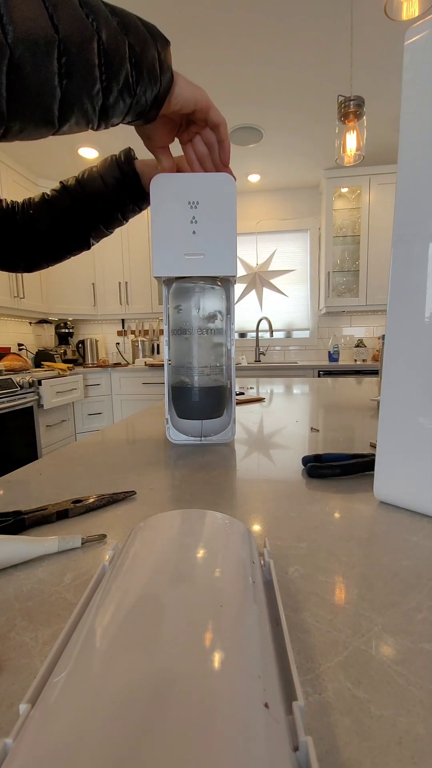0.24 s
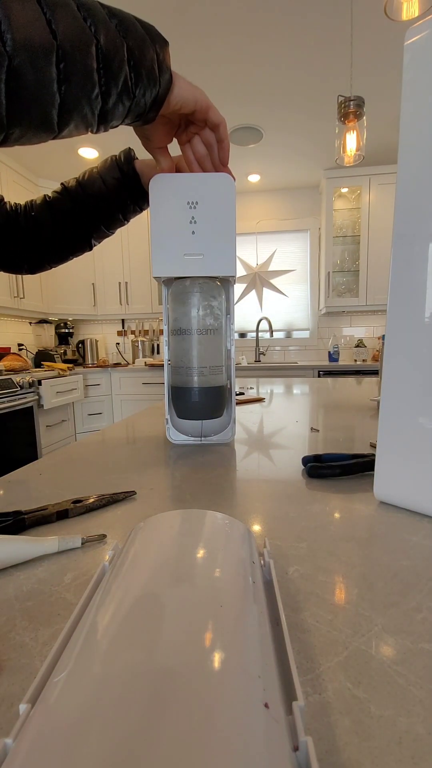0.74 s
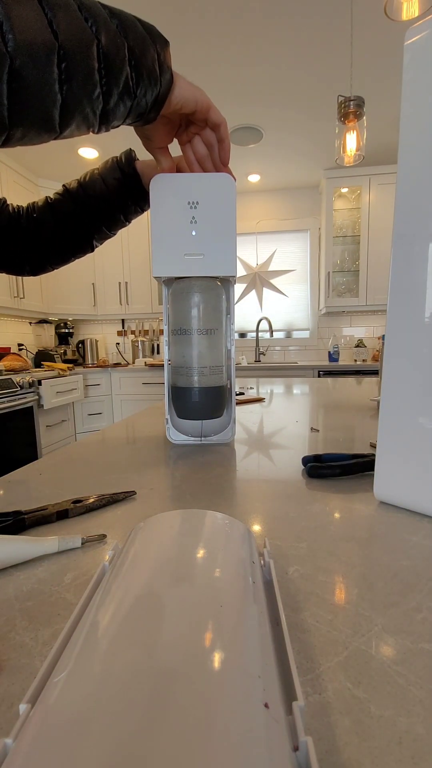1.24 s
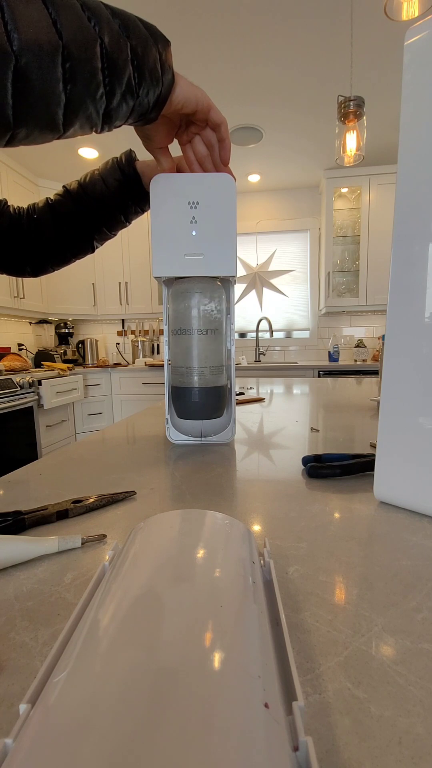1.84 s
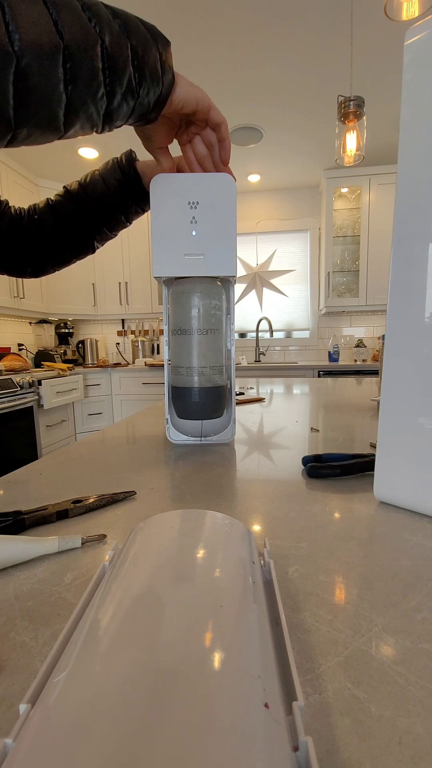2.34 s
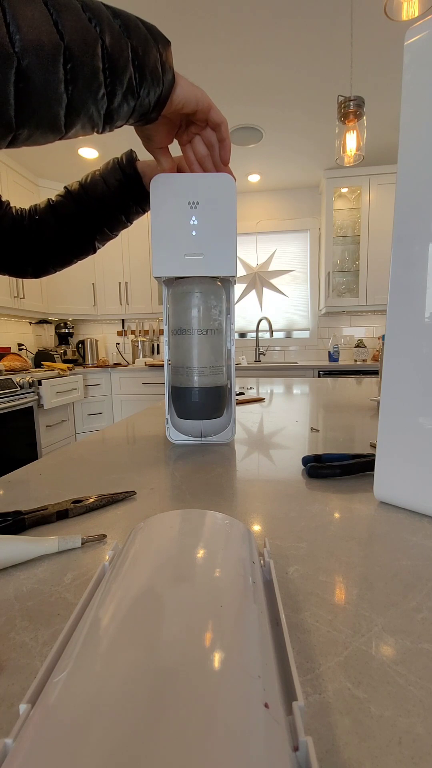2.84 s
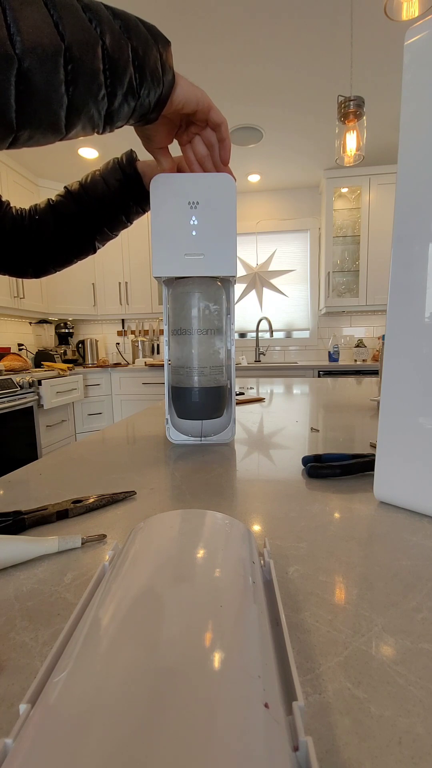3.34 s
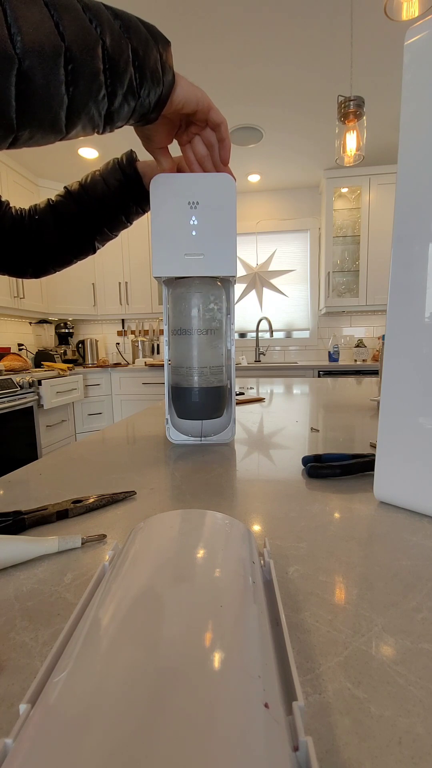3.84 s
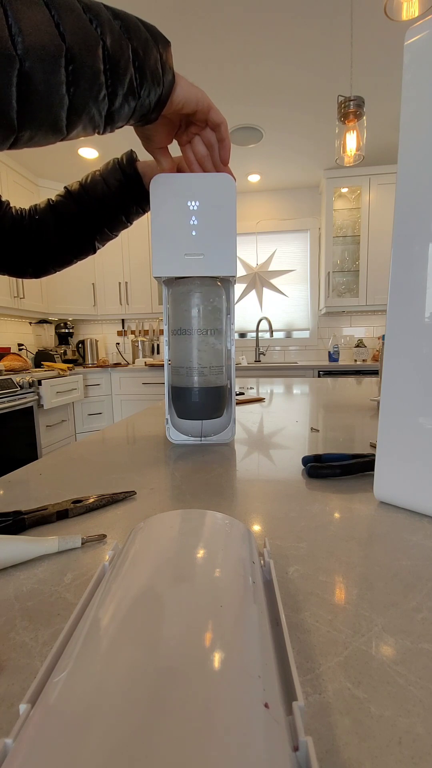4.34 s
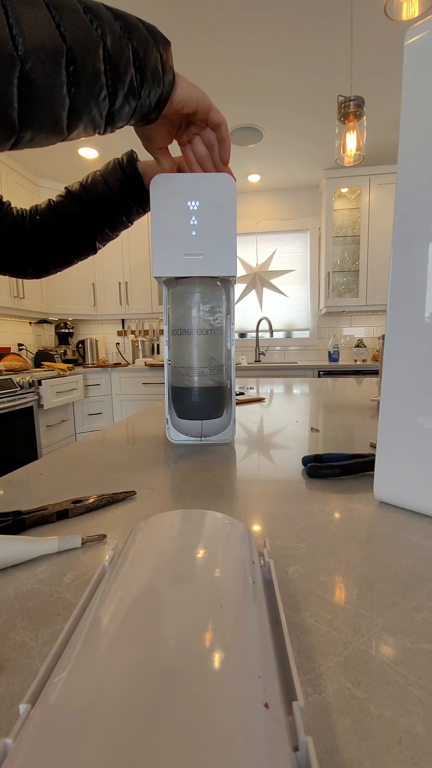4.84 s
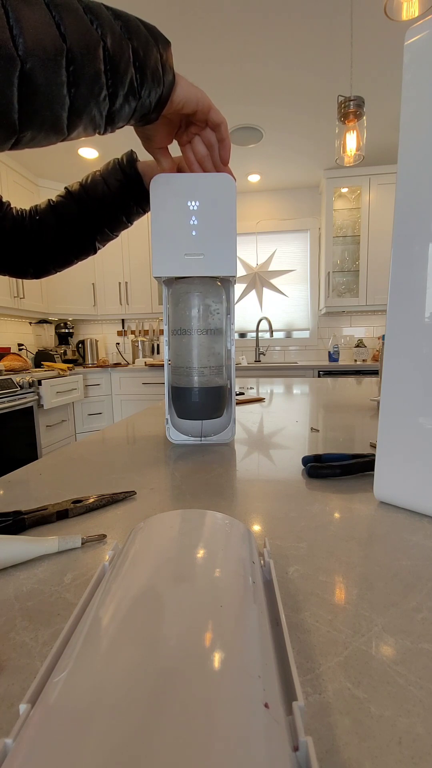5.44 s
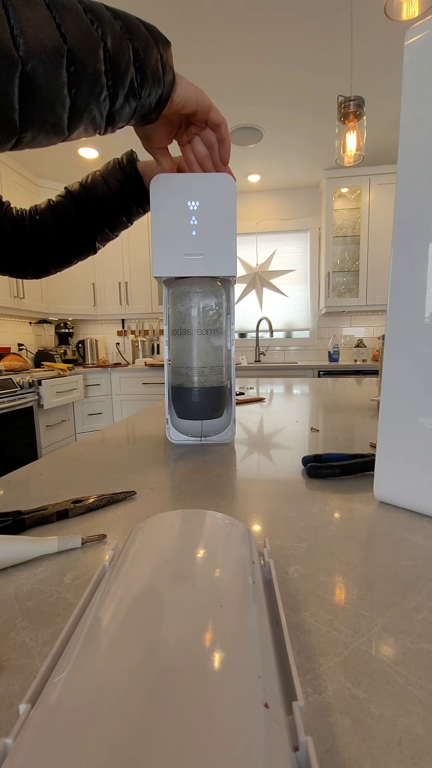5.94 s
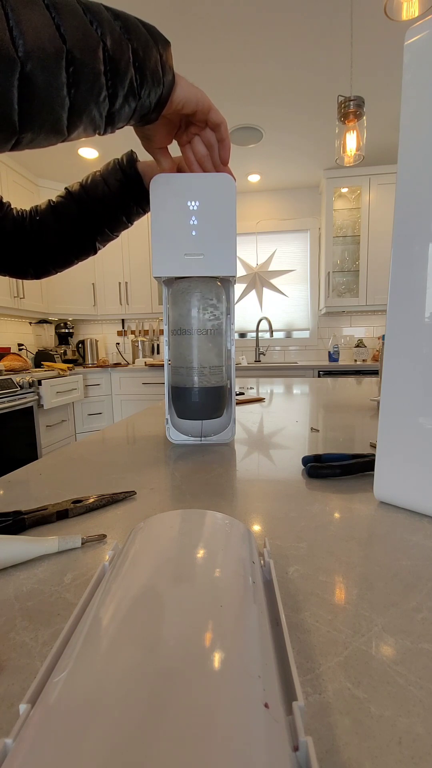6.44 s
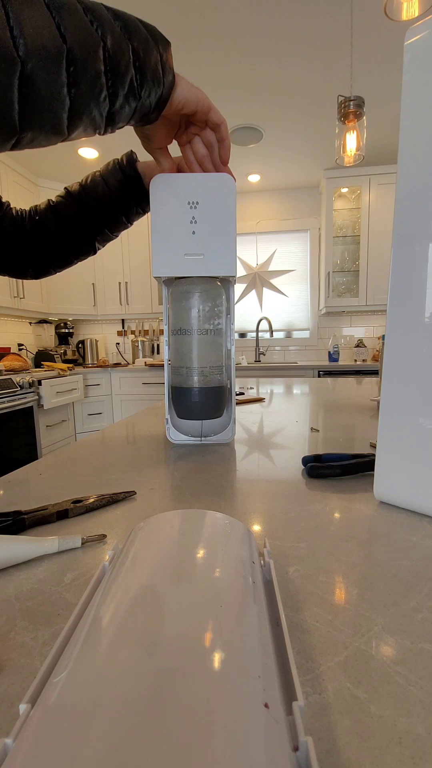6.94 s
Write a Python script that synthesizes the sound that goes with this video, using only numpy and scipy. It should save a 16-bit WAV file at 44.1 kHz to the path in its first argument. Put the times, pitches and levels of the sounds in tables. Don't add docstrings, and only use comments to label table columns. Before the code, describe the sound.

A home carbonator on a kitchen counter is already driving gas into a plastic bottle of water at 0 s, with a bright burst fading within a fraction of a second. Rounded bubbles glug through a ringing, gritty rush until about 0.7 s. Around 0.8 s hard hollow pops strike the bottle wall, clustering strongly to 1.7 s, then recurring irregularly until 6.4 s. The steady roar of bubbles sits around 2 to 3 kHz, nasal and whistling, as lower gurgle shrinks and fine fizz grows. From roughly 2.5 s airy spray brightens it, with tiny faint droplet whistles between 1.7 and 4 s. Near 4 s a thin high valve hiss opens and slowly strengthens. Low rumble remains slight. At about 7.15 s a low gust and small glug mark release as it ends. The close phone microphone hears uneven left and right sides and short hard-wall reflections.

```python
import sys
import numpy as np
from scipy import signal
from scipy.fft import rfft, irfft, next_fast_len
from scipy.io import wavfile
from scipy.ndimage import uniform_filter1d, minimum_filter1d, map_coordinates

SR = 44100
rng = np.random.default_rng(int(sys.argv[2]) if len(sys.argv) > 2 else 0)


def file_out(sig):
    cols = np.atleast_2d(sig).T
    lim = np.clip(cols, -1, 1)
    pcm = np.round(lim * 32767).astype(np.int16)
    wavfile.write(sys.argv[1], SR, pcm)


def to_linear_factor(level_db):
    exponent = np.asarray(level_db, float) / 20
    return 10 ** exponent


N = 316638

# time_s, level_db
JET_LEVEL = [(0.0, -28.5), (0.3, -32.5), (0.78, -30), (0.83, -25), (1.4, -22), (1.5, -22), (1.94, -25.5),
             (2.12, -23), (2.4, -25), (3.2, -25), (3.76, -27.5), (3.9, -26.5), (4.26, -27), (4.5, -25),
             (4.85, -28), (5.62, -23.5), (5.86, -27.5), (7.18, -27)]
# pitch_hz, spread_log_pitch, life_cycles
BUBBLE_FAMILIES = [
    (1439, 0.17, 20),
    (2733, 0.2825, 20.1),
    (4620, 0.177, 32.7),
    (7240, 0.079, 42),
]
# freq_hz, gain_db
BOTTLE_WALL = [(500, -40), (1000, -10.5), (1400, -4.5), (3000, 3), (4800, -8), (5700, -5), (6300, -15),
               (7500, -14), (10000, -40)]
# start_s, peak_db, life_cycles
POCKET_POPS = [(0.8157, -14.5, 46), (0.8433, -4, 52), (0.9687, -7, 18), (1.0654, -7, 23), (1.2293, -11, 23),
               (1.4034, -10, 17), (1.4501, -4, 21), (1.5084, -8.5, 21), (1.5644, -10, 28),
               (1.629, -4.5, 23.4), (1.6908, -5, 9.5), (2.1982, -5, 11.5), (2.3922, -9.5, 16),
               (2.5442, -17, 18), (2.6051, -12.5, 23), (2.6446, -11, 16), (3.1758, -10, 19),
               (3.244, -14, 21), (3.6013, -10.5, 21), (3.7921, -13, 27), (3.9199, -8.5, 25),
               (4.429, -10.5, 30), (4.656, -11, 17), (4.855, -18, 22), (5.0044, -8, 8.5), (5.1602, -36, 23),
               (5.4854, -10, 14), (5.564, -10, 18), (6.2726, -8, 19), (6.3685, -11, 8.3)]
# start_s, peak_db, pitch_hz, life_cycles, pitch_rise_ratio
GLUG_EVENTS = [(0.108, -9, 2710, 21, 0.025), (.258, -23, 710, 31, 0.14), (.275, -30, 1080, 25, 0.17),
               (.295, -16, 1640, 34, .06), (.31, -24, 2070, 54, 0.22), (0.329, -27, 2526, 68, .01),
               (.335, -24, 1810, 36, 0.047), (0.44, -21, 2840, 62, 0.024), (.465, -32, 2080, 22, .03),
               (.5, -21, 1320, 25, .04), (0.554, -21, 2460, 26, .04), (.635, -19.5, 1416, 28, .03),
               (.65, -28, 3750, 48, .01), (.695, -22.5, 1340, 39, 0.018), (1.01, -14.5, 1393, 27, 0.024),
               (1.035, -15.5, 1330, 27, 0.035), (.003, -24, 290, 7.7, .02), (7.035, -34.5, 370, 18, .05),
               (7.163, -19, 610, 8.4, 0.054), (7.166, -18, 2470, 15, .02)]
# start_s, peak_db, pitch_hz
NOZZLE_SPITS = [(1.6826, -55, 7400), (1.9431, -52, 7400), (1.966, -52, 7460), (2.3496, -49, 7300),
                (2.392, -95, 7660), (2.4165, -47, 7700), (2.5347, -60, 7450), (2.6514, -74, 7040),
                (2.866, -49, 6800), (2.9962, -44, 7580), (3.3134, -51, 7800), (3.4831, -50, 7400),
                (3.5404, -56, 7700), (3.8602, -44, 6600), (3.9191, -56, 7080), (4.0513, -48, 7400)]
FIRST_RUSH_DB = [-22, -34, -35, -32, -42.5, -41]
# freq_hz, density_db_per_hz
BURST_SPECTRUM = [(1760, -51), (3000, -0.5), (3640, -9.5), (4600, -7), (5280, 0), (6360, -7), (7250, -4),
                  (8790, -10.5), (10700, -10.5), (15600, -18)]
# freq_hz, density_db_per_hz
HISS_SPECTRUM = [(3820, -15), (6500, -3.5), (7780, 1), (8120, 5), (8580, 2), (9510, 1), (10900, 1.5),
                 (12700, 0.5), (14200, 1), (15600, -2)]
# freq_hz, width_hz, gain_db
CASE_NOTCHES = [(8500, 300, -5.5), (9480, 170, -4), (13100, 470, -11)]
# freq_hz, density_db_per_hz
ROAR_SPECTRUM = [(210, -52), (350, -6), (487, -6), (548, -0.5), (774, 3.5), (1030, 1), (1200, -1),
                 (1560, -34), (2640, -120)]
# freq_hz, density_db_per_hz
RUMBLE_SPECTRUM = [(15, -55), (45, -24), (66, -8), (97, -17.5), (141, -3), (173, -5.5), (200, -0.5),
                   (226, -6), (258, 2), (409, -8.5), (450, -5.5), (580, -9), (990, -120)]
# freq_hz, density_db_per_hz
BOOM_SPECTRUM = [(120, -18), (140, -19), (147, 8), (155, -7), (180, -21)]
# centre_s, level_db, width_s
COUNTER_SHUDDERS = [(.29, -47, .04), (.54, -43, 0.14), (1.0, -53, 0.086), (5.25, -54, .08)]
# freq_hz, t60_s
KITCHEN_DECAY = [(150, .3), (1000, .13), (4000, .09), (12000, .1)]
# freq_hz, gain_db
ROOM_GAIN = [(60, -16), (250, -17), (700, 0.5), (1500, 3), (2500, 1), (5000, 6), (9000, -6.5),
             (12000, -0.5), (15000, -0.5)]
# freq_hz, width_hz, gain_db
CAVITY_MODES = [(2106, 277, 2.5), (2552, 264, 18), (2975, 190, -5), (3750, 600, 1.5), (5100, 840, -8.5),
                (7330, 300, -6), (10100, 900, -13), (14900, 850, -15)]
# freq_hz, gain_db
LEFT_SHADE = [(300, 0), (800, -7), (1500, -7), (2500, -8.5), (3100, -8), (4500, -5), (6500, -6.5),
              (8800, -7), (11000, -1), (15000, 0)]
# freq_hz, phase_rad
LEFT_LEAD = [(0, 0), (860, 0.3), (1720, -0.1), (2840, 3.7), (3620, 4.8), (4390, 9.4), (5250, 8.3),
             (6370, 12.6), (6980, 12.6), (15300, 12.6)]
# freq_hz, density_db_per_hz
PORT_SPECTRUM = [(25, -22), (45, 0), (100, -2), (300, 4), (1000, -20), (9000, -26), (13000, -18),
                 (16000, -21)]

FILL_START_S, FILL_S = 0.8, 0.76
LARGE_DB, LARGE_LOSS_DB, LARGE_FOLLOWS = -34, 7.5, 0.33
FINE_DB, FINE_GAIN_DB, FINE_FOLLOWS = -45.5, 11.5, 0.62
SPRAY_DB, SPRAY_GAIN_DB, SPRAY_S, SPRAY_RISE_S = -52, 11.5, 2.6, 0.18
SPIT_FIZZ_DB, SPIT_FIZZ_S = -4, 0.022
SMALL_POP_DB, SMALL_SPREAD_DB, SMALL_CYCLES = 7.5, 6, 30
CRACK_DB = -11
DEEP_DB, DEEP_LOSS_DB = -8, 17
RUSH_DB_PER_S, SETTLE_DB_PER_S = 61, 12.5
SETTLE_HISS_DB, SETTLE_ROAR_DB, SETTLE_RUMBLE_DB = -43, -41, -73.5
HISS_DB, ROAR_DB, RUMBLE_DB, BOOM_DB = -53, -56.5, -57.5, -59
PUFF_S, PUFF_DB, PUFF_WIDTH_S = 0.11, -31, 0.006
RELIEF_S, RELIEF_RISE_S, CREEP_S = 3.94, 0.13, 0.92
LEAK_DB, LEAK_ROAR_DB, CRACK_SHARE = -44, -53.5, 0.3
RELEASE_S, RELEASE_RISE_S, RELEASE_ROAR_DB, RELEASE_RUMBLE_DB = 7.165, 0.015, -38, -50
FACING_DB = -9
PORT_DB, TOP_HZ = -75, 15730


def bubbles():
    t = np.arange(N) / SR
    jet_db, = curves(JET_LEVEL)
    swing_db = jet_db - jet_db.mean()
    first = to_linear_factor(-RUSH_DB_PER_S * t)
    _, rush_large_db, rush_fine_db, rush_spray_db, _, _ = FIRST_RUSH_DB

    large_db = LARGE_DB - LARGE_LOSS_DB * pressure(t) + LARGE_FOLLOWS * swing_db
    fine_db = FINE_DB + FINE_GAIN_DB * pressure(t) + FINE_FOLLOWS * swing_db
    spray_db = SPRAY_DB + SPRAY_GAIN_DB * ramp(SPRAY_S, SPRAY_RISE_S) + 2.1 * wobble(22)
    fizz = sum(to_linear_factor(db + SPIT_FIZZ_DB) * bell(t, s, SPIT_FIZZ_S) for s, db, _ in NOZZLE_SPITS)
    levels = [to_linear_factor(large_db) + to_linear_factor(rush_large_db) * first,
              to_linear_factor(jet_db - 8.5),
              to_linear_factor(fine_db) + to_linear_factor(rush_fine_db) * first,
              to_linear_factor(spray_db) + to_linear_factor(rush_spray_db) * first + fizz]

    surge_db = 1.3 * flutter(30) + 1.37 * flutter(80)
    cloud = np.zeros(N)
    for (hz, spread, cycles), level in zip(BUBBLE_FAMILIES, levels):
        when, side, rare = rng.random((3, 3000))
        pitch_hz = hz * np.exp(spread * rng.standard_normal(3000))
        size_db = np.minimum(-2.8 * np.log(rare + 1e-9), 13)
        gain = to_linear_factor(size_db) * np.sign(side - 0.5)
        swarm = rings(when * N / SR, pitch_hz, cycles, gain, glide=0.048, onset=1.53, size=400)
        band = [(hz * np.exp(k * spread), db) for k, db in [(-4, -24), (-1, 0), (1, 0), (4, -24)]]
        foam = rush(band, patchy_db=2.17)
        cloud += level * to_linear_factor(surge_db + 0.41 * flutter(30)) * unit(unit(swarm) + 0.99 * foam)
    return filtered(cloud, lambda f: to_linear_factor(along(BOTTLE_WALL, f)))


def pops(count=90):
    when_s, size = rng.random(count) * N / SR, rng.standard_normal(count)
    jet_db = np.interp(when_s, *np.transpose(JET_LEVEL))
    small_db = jet_db + SMALL_POP_DB + SMALL_SPREAD_DB * np.clip(size, -2, 1.2)
    small = np.array([when_s, small_db, np.full(count, SMALL_CYCLES)])
    large = np.transpose(POCKET_POPS) + [[0], [6], [0]]
    s, db, cycles = np.hstack([small, large])

    knock_dev, deep_dev, chance = rng.standard_normal((len(s), 3)).T
    knock_hz = 2590 * np.exp(0.049 * knock_dev)
    crack_hz = 3400 * np.exp(0.15 * chance)
    deep_hz = 1450 * np.exp(0.052 * deep_dev)
    deep_db = db + DEEP_DB - DEEP_LOSS_DB * pressure(s) + 1.9 * chance
    knock = rings(s, knock_hz, np.clip(cycles, 2, 40), to_linear_factor(db - 13.5), glide=0.0073, size=900)
    crack = rings(s, crack_hz, 5.1, to_linear_factor(db + CRACK_DB), glide=0.022, size=128)
    deep = rings(s, deep_hz, 8.3, to_linear_factor(deep_db), glide=0.025)
    return knock + crack + deep


def glugs():
    s, db, hz, cycles, rise = np.transpose(GLUG_EVENTS)
    return rings(s, hz, cycles, to_linear_factor(db), glide=rise[:, None], onset=6.5, size=2400)


def spits():
    s, db, hz = np.transpose(NOZZLE_SPITS)
    return rings(s, hz, 124, to_linear_factor(db + 9.5), glide=0.011, onset=12, size=1200)


def valve():
    t = np.arange(N) / SR
    first, settle = to_linear_factor(-RUSH_DB_PER_S * t), to_linear_factor(-SETTLE_DB_PER_S * t)
    release = ramp(RELEASE_S, RELEASE_RISE_S)
    creep = 1 - np.exp(-np.maximum(t - RELIEF_S, 0) / CREEP_S)
    leak = ramp(RELIEF_S, RELIEF_RISE_S) * (CRACK_SHARE + (1 - CRACK_SHARE) * creep)
    rush_burst_db, _, _, _, rush_roar_db, rush_rumble_db = FIRST_RUSH_DB

    burst_level = to_linear_factor(rush_burst_db) * first + to_linear_factor(PUFF_DB) * bell(t, PUFF_S, PUFF_WIDTH_S)
    burst = burst_level * rush(BURST_SPECTRUM, patchy_db=1.5)

    hiss_level = to_linear_factor(HISS_DB) + to_linear_factor(SETTLE_HISS_DB) * settle + to_linear_factor(LEAK_DB) * leak
    hiss = hiss_level * to_linear_factor(0.9 * flutter(20)) * rush(HISS_SPECTRUM, patchy_db=1.5)
    hiss = filtered(hiss, lambda f: to_linear_factor(sum(db * bell(f, hz, width) for hz, width, db in CASE_NOTCHES)))

    roar_level = (to_linear_factor(ROAR_DB) + to_linear_factor(rush_roar_db) * first + to_linear_factor(SETTLE_ROAR_DB) * settle
                  + to_linear_factor(LEAK_ROAR_DB) * leak + to_linear_factor(RELEASE_ROAR_DB) * release)
    roar = roar_level * to_linear_factor(0.27 * wobble(10)) * rush(ROAR_SPECTRUM, patchy_db=3.5)

    rumble_level = (to_linear_factor(RUMBLE_DB) + to_linear_factor(rush_rumble_db) * first + to_linear_factor(SETTLE_RUMBLE_DB) * settle
                    + to_linear_factor(RELEASE_RUMBLE_DB) * release)
    rumble = rumble_level * to_linear_factor(0.81 * wobble(5.5)) * rush(RUMBLE_SPECTRUM, patchy_db=3.0)

    shudder = sum(to_linear_factor(db) * bell(t, s, width) for s, db, width in COUNTER_SHUDDERS)
    boom = (to_linear_factor(BOOM_DB + 1.5 * wobble(3.94)) + shudder) * rush(BOOM_SPECTRUM, patchy_db=-2.0)
    return burst + hiss + roar + rumble + boom


def kitchen(x, count=8):
    hz, t, z = signal.stft(rng.standard_normal((count, 2, SR // 3)), SR, nperseg=256)
    z = z * to_linear_factor(-60 * t / along(KITCHEN_DECAY, hz)[:, None])
    z = z / np.sqrt(np.mean(abs(z) ** 2, axis=(0, 1, 3), keepdims=True))
    tails = signal.istft(z, SR, nperseg=256)[1]
    tails = tails / np.linalg.norm(tails[0, 0])
    away = (np.arange(N) / (SR // 24) - np.arange(count)[:, None]) % count
    turns = np.sin(np.pi / 2 * np.clip(away, 0, 2))
    wet = signal.fftconvolve((turns * x)[:, None], tails, axes=2).sum(axis=0)
    late = np.pad(wet, ((0, 0), (130, 0)))[:, :N]
    return filtered(late, lambda f: to_linear_factor(along(ROOM_GAIN, f)))


def port_noise():
    return to_linear_factor(PORT_DB) * np.array([rush(PORT_SPECTRUM, patchy_db=1.1) for _ in range(2)])


def right_port(f):
    return 1 + sum(to_linear_factor(db) * 1j * f * w / (c * c - f * f + 1j * f * w) for c, w, db in CAVITY_MODES)


def left_port(f):
    return to_linear_factor(along(LEFT_SHADE, f)) * np.exp(1j * (along(LEFT_LEAD, f) + np.angle(right_port(f))))


def rings(s, hz, cycles, gain, glide, onset=1.0, size=256):
    k = np.arange(size)
    turn = hz[:, None] * k / SR
    life = turn / np.reshape(cycles, (-1, 1))
    envelope = gain[:, None] * np.exp(-3 * life) * (1 - np.exp(-turn / onset))
    wave = envelope * np.sin(2 * np.pi * turn * (1 + glide * life))
    at = np.round(s * SR).astype(int)[:, None] + k
    return np.bincount(at.ravel(), wave.ravel(), N + size)[:N]


def rush(spectrum, patchy_db):
    z = signal.stft(rng.standard_normal(N), nperseg=512)[2]
    field = uniform_filter1d(rng.standard_normal(z.shape), size=5, axis=0)
    field = uniform_filter1d(field, size=8, axis=1)
    noise = signal.istft(z * to_linear_factor(patchy_db * unit(field)), nperseg=512)[1][:N]
    return unit(filtered(noise, lambda f: to_linear_factor(along(spectrum, f))))


def pressure(s):
    return 1 - np.exp(-np.maximum(s - FILL_START_S, 0) / FILL_S)


def ramp(at_s, rise_s):
    return 0.5 + 0.5 * np.tanh((np.arange(N) / SR - at_s) / rise_s)


def bell(x, centre, width):
    return np.exp(-((x - centre) / width) ** 2)


def wobble(rate_hz):
    knots = rng.standard_normal(int(N * rate_hz / SR) + 4)
    return map_coordinates(knots, [np.arange(N) * rate_hz / SR])


def flutter(rate_hz):
    curve = wobble(rate_hz)
    return curve - uniform_filter1d(curve, size=SR // 14)


def curves(rows):
    s, *cols = np.transpose(rows)
    return [np.interp(np.arange(N) / SR, s, c) for c in cols]


def along(points, hz):
    f, v = np.transpose(points)
    return np.interp(np.log(hz + 1), np.log(f + 1), v)


def filtered(x, response):
    m = next_fast_len(N + SR // 2)
    return irfft(rfft(x, m) * response(np.fft.rfftfreq(m, 1 / SR)), m)[..., :N]


def unit(x):
    return x / np.sqrt(np.mean(x ** 2) + 1e-20)


def scene():
    machine = bubbles() + pops() + glugs() + spits() + valve()
    return machine + to_linear_factor([[0], [FACING_DB]]) * kitchen(machine)


def top_cut(x):
    return signal.sosfilt(signal.butter(12, 15730, fs=SR, output="sos"), x)


def record(dry):
    heard = filtered(dry, lambda f: np.array([left_port(f), right_port(f)]) * (f < TOP_HZ))
    x = heard + filtered(port_noise(), lambda f: f < TOP_HZ)
    needed = np.minimum(1, 0.99 / (abs(x).max(axis=0) + 1e-9))
    mix = x * uniform_filter1d(minimum_filter1d(needed, size=301), size=151)
    return top_cut(mix)


dry = scene()
out = record(dry)
file_out(out)
```